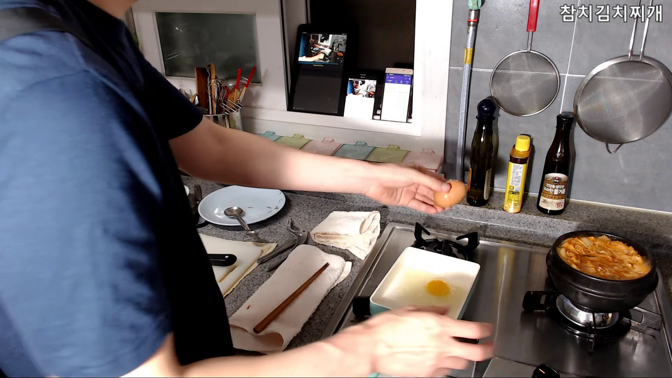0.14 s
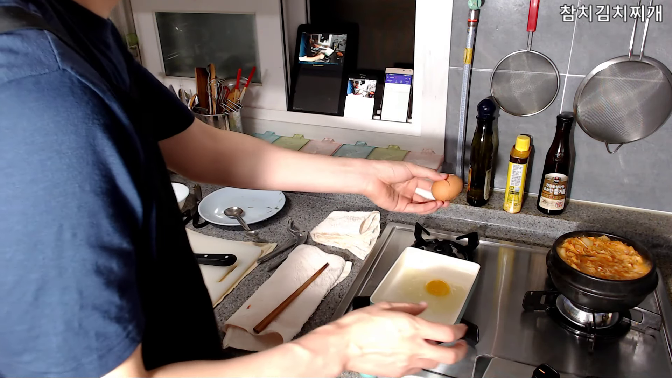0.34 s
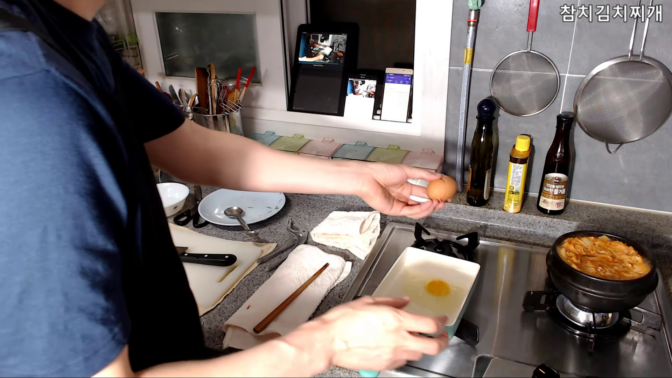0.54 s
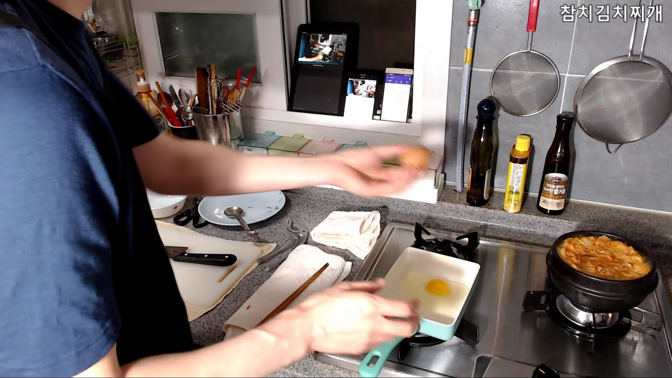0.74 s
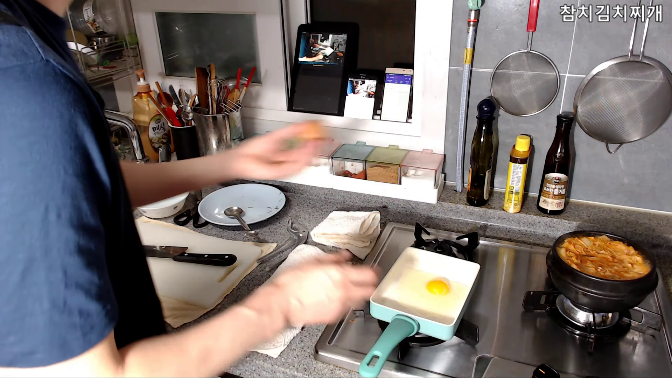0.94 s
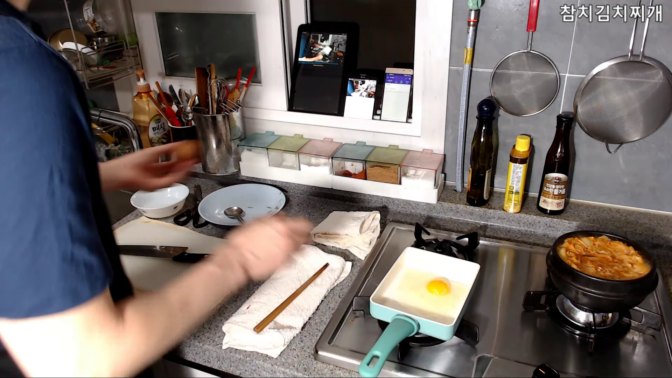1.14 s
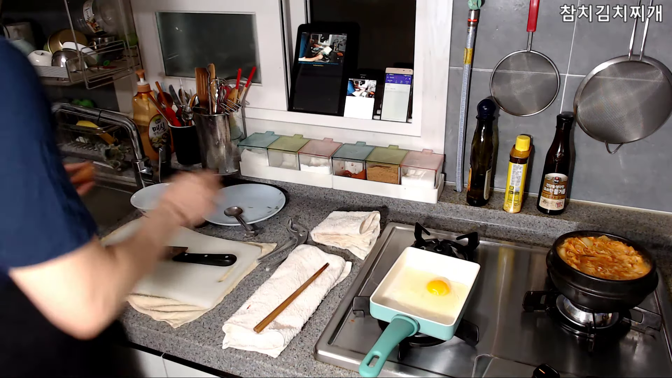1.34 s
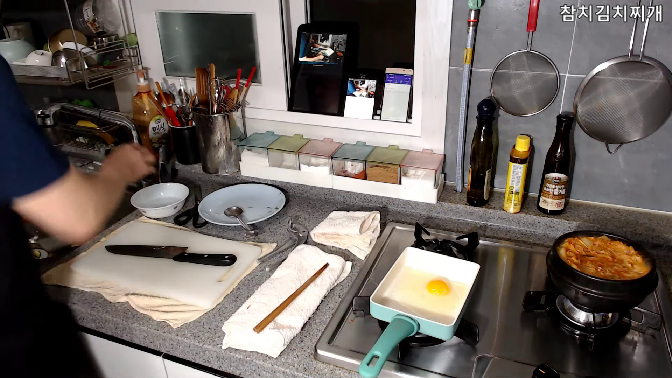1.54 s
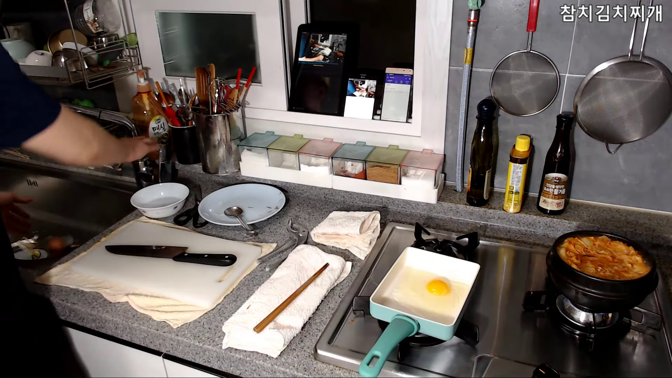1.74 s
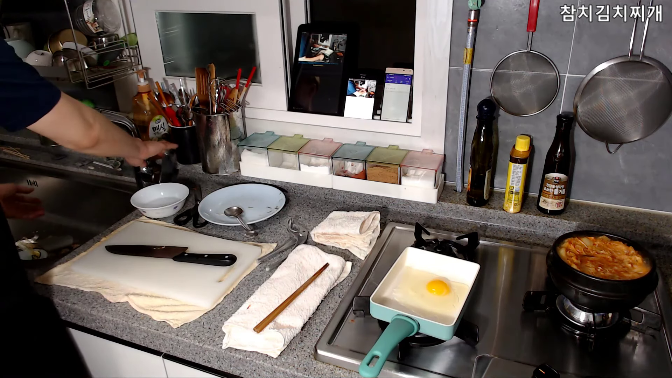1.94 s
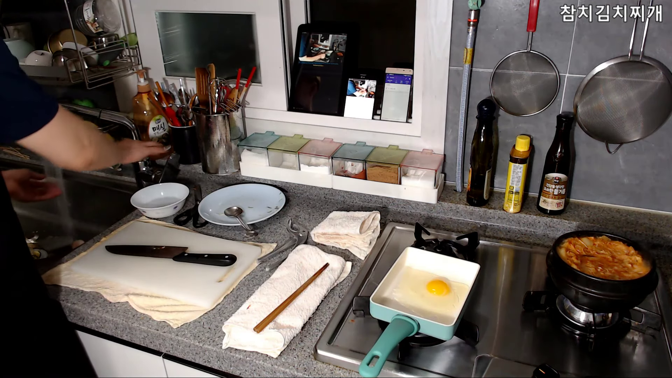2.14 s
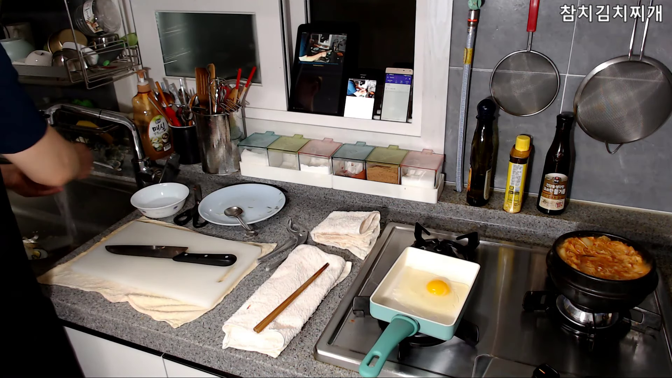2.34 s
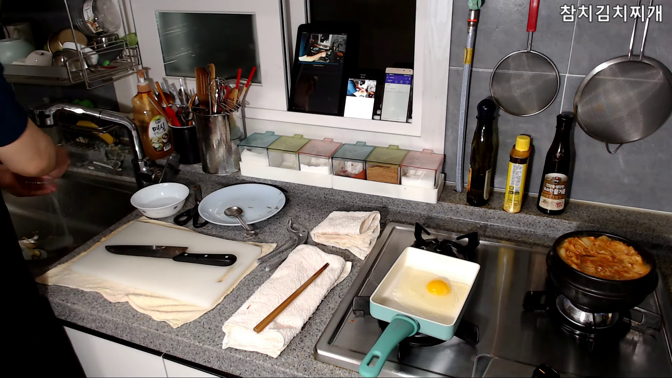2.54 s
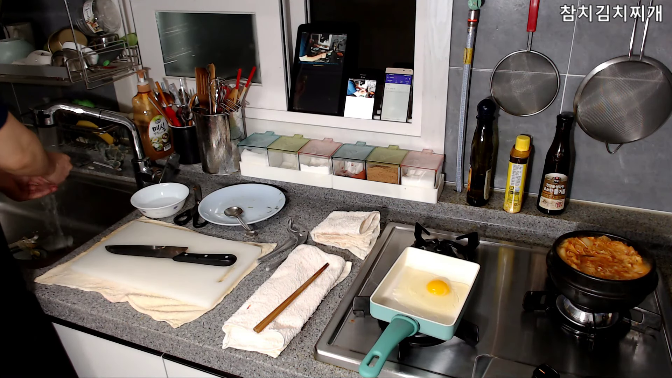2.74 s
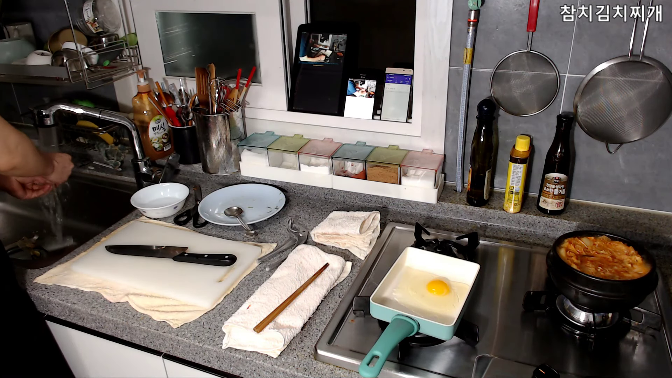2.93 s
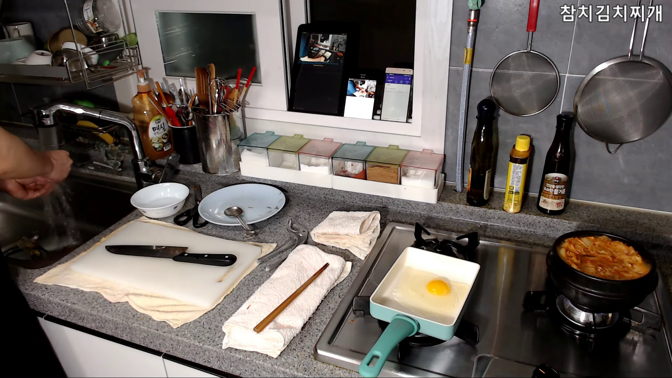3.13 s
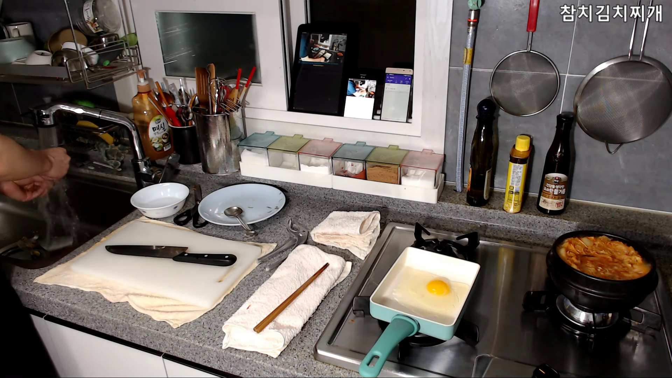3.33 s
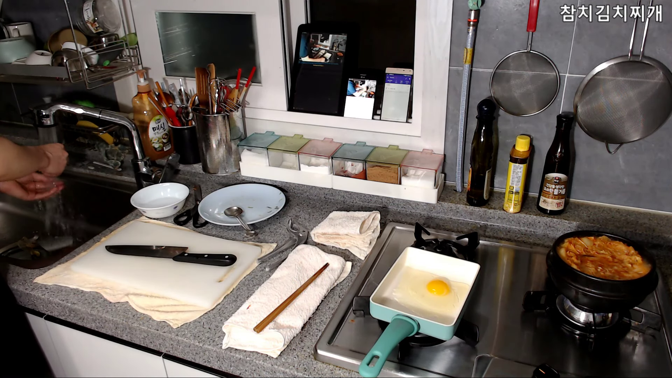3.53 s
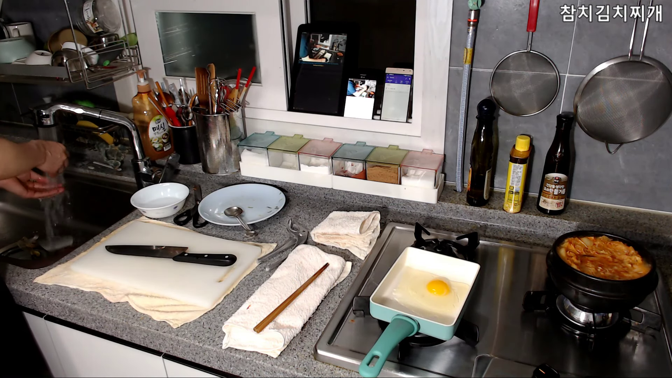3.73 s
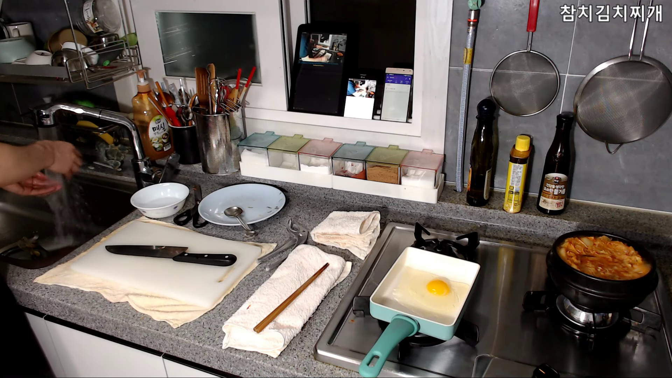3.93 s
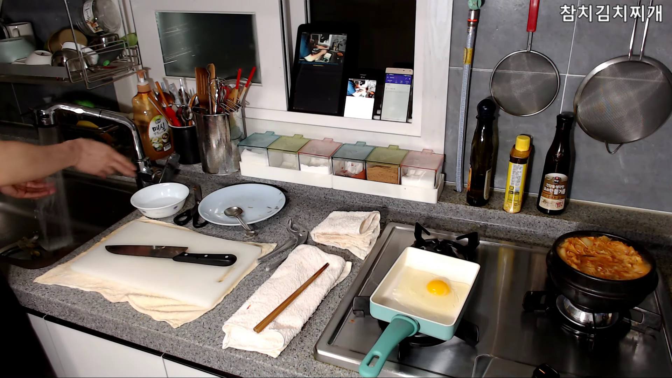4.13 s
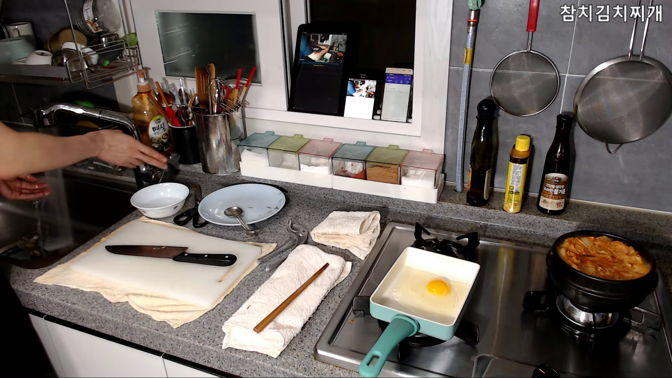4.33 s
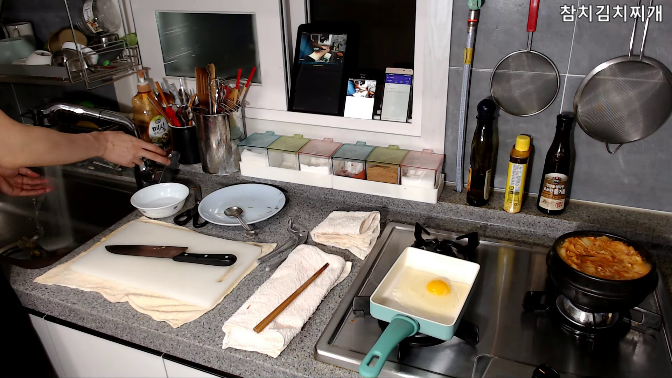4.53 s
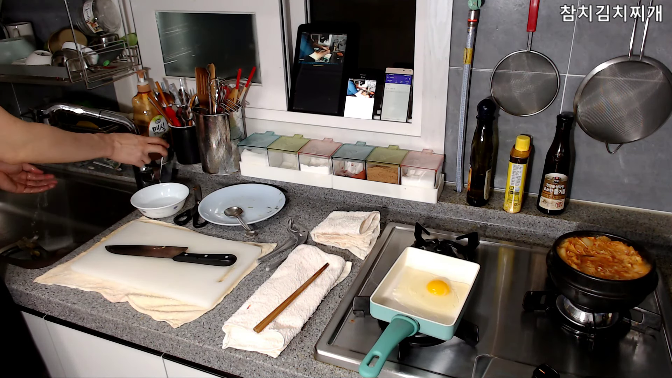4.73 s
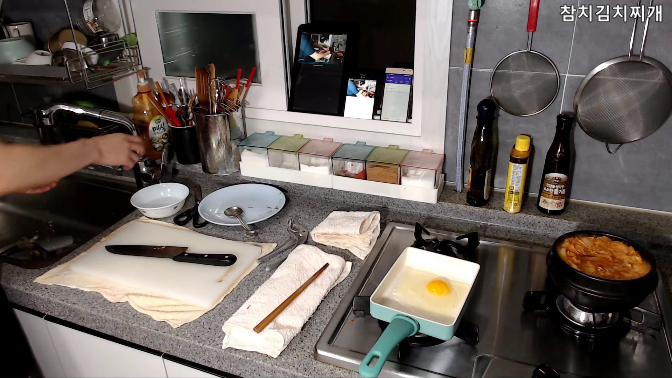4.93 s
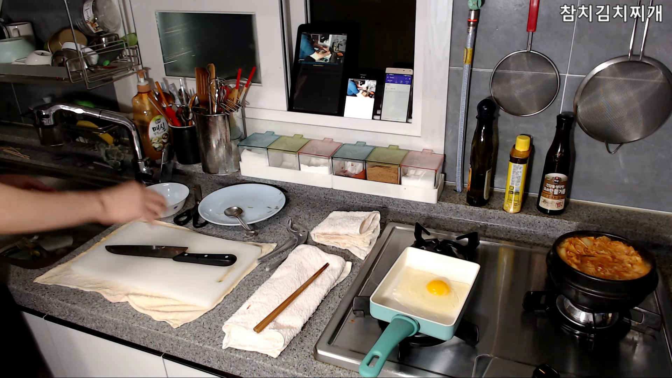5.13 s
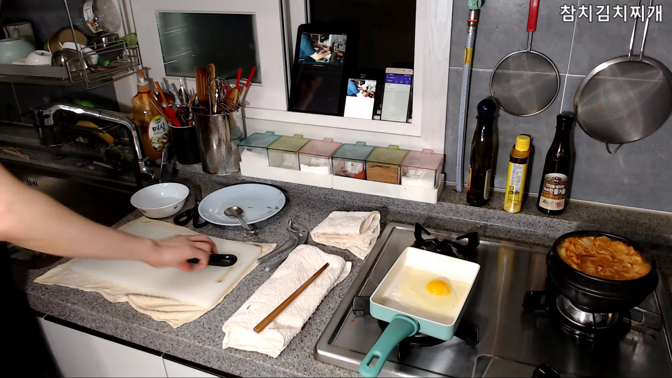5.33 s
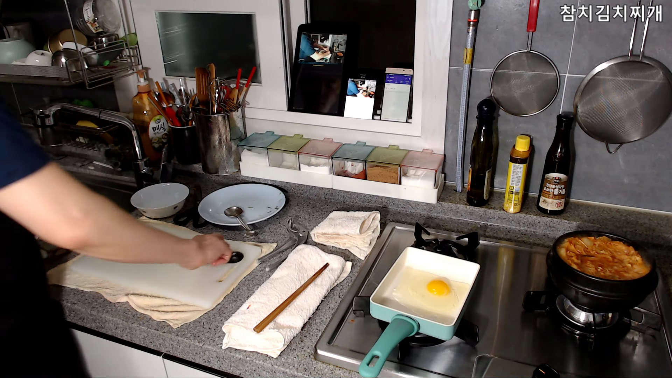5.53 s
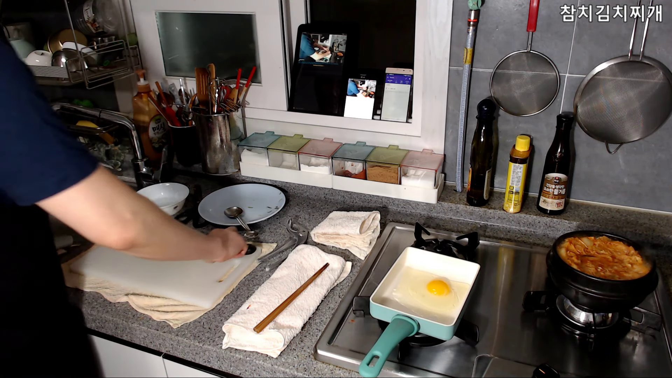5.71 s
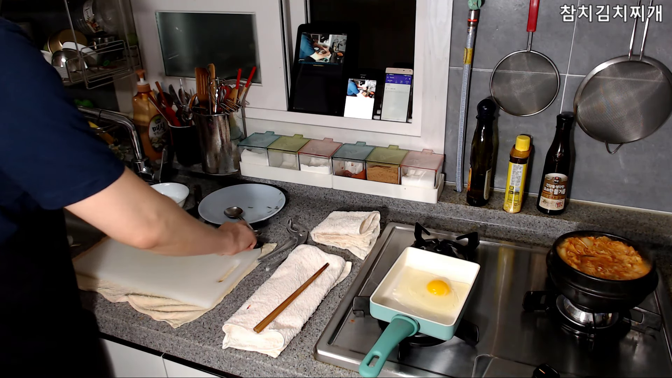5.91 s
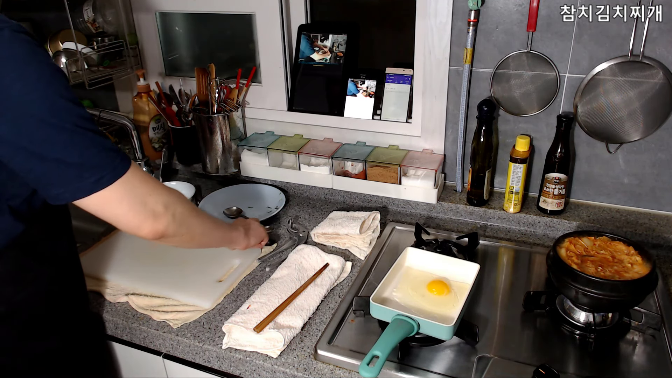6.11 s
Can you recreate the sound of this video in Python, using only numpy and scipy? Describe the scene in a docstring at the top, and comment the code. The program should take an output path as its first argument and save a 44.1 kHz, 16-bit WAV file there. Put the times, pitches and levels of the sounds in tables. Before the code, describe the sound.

In a small kitchen, a stew simmers faintly on a hissing gas ring. A thrown eggshell strikes a steel sink and bounces. The tap then runs over hands for a few seconds, spraying, gurgling and drumming on the basin, and is shut off with a few drips. A knife slides off a cutting board, clinks against cutlery and knocks sharply on the board. One microphone picks up everything with a short room echo.

```python
"""Kitchen sink and stove

A small hard-walled kitchen, one microphone. A stew simmers on a hissing gas ring; a rumble comes up
through the counter. A faint hiss swells, with two soft brushes; a thrown eggshell rings the steel sink.
The tap runs over hands, spraying, bubbling and drumming on the basin, and is shut; drops plink. A knife
slides off a board, something hard drags over a plate, the knife clinks on cutlery, knocks the board."""
import sys
import numpy as np
from scipy import signal
from scipy.fft import rfft, irfft, next_fast_len
from scipy.io import wavfile
from scipy.ndimage import uniform_filter1d, map_coordinates

SR = 44100
rng = np.random.default_rng(int(sys.argv[2]) if len(sys.argv) > 2 else 0)


def wav_record(signal):
    """Record a signal, one row per channel, as 16-bit PCM in the file named by sys.argv[1]."""
    frames = np.transpose(np.atleast_2d(signal))
    bounded = np.clip(frames, -1, 1)
    # unit amplitude maps onto the largest positive 16-bit level
    quanta = np.round(bounded * 32767).astype(np.int16)
    wavfile.write(sys.argv[1], SR, quanta)


N = 271819

# steel sink resonances: f/Hz, width/Hz, lift/dB
BASIN = [(205, 38, 2.5), (357.6, 16, 10.5), (563, 86, 6.5), (652, 24, 7.5), (749, 31, 9), (1200, 14, 3),
         (1405, 28, 5), (1574, 19, 9.5), (1767, 30, 5), (2700, 100, -2), (3280, 15, 3), (3770, 42, 3),
         (4420, 34, -2), (5760, 25, -3), (7020, 52, 4.5)]
# short splashy burst in the basin as the shell bounces: t/s, attack/s, hold/s, release/s
BOUNCE_SPLASH = (1.7, 0.046, 0.0079, 0.063)
OPEN_S, SHUT_S = 2.105, 4.618  # full stream


def amp(db):
    """dB to gain."""
    return 10 ** (np.asarray(db) / 20)


def unit(x):
    """x at rms 1."""
    return x / np.sqrt(np.mean(x ** 2) + 1e-20)


def along(points, hz):
    """Interpolate (f/Hz, value) points on a log axis."""
    f, v = np.transpose(points)
    return np.interp(np.log(hz + 1), np.log(f + 1), v)


def lift(hz, humps):
    """dB added by resonances (f/Hz, width/Hz, lift/dB)."""
    return sum(db / (1 + (2 * (hz - centre) / width) ** 2) for centre, width, db in humps)


def envelope(points):
    """Gain through (t/s, level/dB) points, silent outside them."""
    times, db = np.transpose(points)
    return amp(np.interp(np.arange(N) / SR, times, db, -150, -150))


def stroke(at_s, db, attack_s, hold_s, release_s):
    """Gain held from at_s; attack and release are times per 30 dB."""
    t = np.arange(N) / SR - at_s
    return amp(db - 30 * (np.maximum(-t, 0) / attack_s + np.maximum(t - hold_s, 0) / release_s))


def wobble(rate_hz):
    """Smooth curve through random knots."""
    knots = rng.standard_normal(int(N * rate_hz / SR) + 4)
    return map_coordinates(knots, [np.arange(N) * rate_hz / SR])


def filtered(x, response):
    """Zero-phase filter of gain response(f/Hz)."""
    m = next_fast_len(x.shape[-1] + 8192)
    return irfft(rfft(x, m) * response(np.fft.rfftfreq(m, 1 / SR)), m)[..., :x.shape[-1]]


def causal(x, gain_db):
    """Minimum-phase filter: nothing sounds before the blow."""
    cepstrum = irfft(np.log(amp(gain_db(np.fft.rfftfreq(4096, 1 / SR))) + 1e-6))
    cepstrum[1:2048] *= 2
    cepstrum[2049:] = 0
    return signal.fftconvolve(x, irfft(np.exp(rfft(cepstrum))))[:len(x)]


def rush(colour, humps, patchy_db):
    """Coloured noise, rms 1, with resonant humps and patches of random gain."""
    z = signal.stft(rng.standard_normal(N + 512), nperseg=256)[2]
    patches = uniform_filter1d(rng.standard_normal(z.shape), size=4, axis=0)
    patches = uniform_filter1d(patches, size=8, axis=1)
    noise = signal.istft(z * amp(patchy_db * unit(patches)), nperseg=256)[1][:N]
    return unit(filtered(noise, lambda f: amp(along(colour, f) + lift(f, humps))))


def echoes(near_db):
    """Fresh room tail, energy 1: dense near echoes, then a decay that varies with frequency."""
    # kitchen reverberation: f/Hz, t60/s
    reverb_times = [(100, 0.45), (500, 0.42), (2000, 0.44), (5000, 0.38), (10000, 0.33)]
    hz, t, z = signal.stft(rng.standard_normal(SR // 2), SR, nperseg=128)
    decay = amp(-60 * t / along(reverb_times, hz)[:, None]) + amp(near_db - 60 * t / 0.088)
    tail = signal.istft(z * decay, SR, nperseg=128)[1][:SR // 2]
    return tail / np.linalg.norm(tail)


def kitchen(x, wet_db):
    """Moving water excites the room from ever new spots: cross-faded pieces, each with its own tail."""
    out, hop = np.pad(x, (0, SR)), SR // 10
    fade = np.hanning(2 * hop + 1)[:-1]
    for at in range(0, N - 2 * hop, hop):
        wet = signal.fftconvolve(x[at:at + 2 * hop] * fade, echoes(near_db=0))
        out[at:at + len(wet)] += amp(wet_db) * wet
    return out[:N]


def bubble(t, hz, rise, life_s):
    """Damped sine whose pitch climbs as the bubble nears the surface."""
    phase = 2 * np.pi * hz * (t + rise * t * np.tanh(t / (2 * life_s)))
    return np.sin(phase) * np.exp(-2 * t / life_s) * (1 - np.exp(-t * hz / 2))


def fizz(count, mid_hz, spread, cycles, scatter_db):
    """Dense random crowd of small bubbles, rms 1."""
    starts = (rng.random(count) * N).astype(int)
    hz = np.clip(mid_hz * np.exp(spread * rng.standard_normal(count)), 700, 11000)[:, None]
    size = np.minimum(rng.exponential(size=count), 4)
    k = np.arange(640)
    grains = amp(scatter_db * size)[:, None] * bubble(k / SR, hz, 0.14, cycles / hz)
    return unit(np.bincount((starts[:, None] + k).ravel(), grains.ravel(), N)[:N])


def place(out, x, at_s, db, window):
    """Add x at at_s, its peak rms over window samples set to db."""
    peak = np.sqrt(uniform_filter1d(x ** 2, size=window).max())
    out[round(at_s * SR):][:len(x)] += amp(db) * x / peak


def blows(hits, colour, modes, hump_db, wet_db, neighbour_gain):
    """Each blow: a rattle of contacts with its room tail; the modes ring on, each with two neighbours."""
    out, t = np.zeros(N + SR), np.arange(SR // 2) / SR
    humps = [(hz, 60 + 7 / t60, hump_db) for hz, _, t60 in modes]
    detune = 0.012 * np.array([[0], [-1], [1]])
    for at_s, db, rise_s, rattle_s, tilt_db, ring_db in hits:
        swell = (1 - np.exp(-t / rise_s)) ** 2
        lumps = amp(2.5 * rng.standard_normal(len(t) // 40 + 1).repeat(40)[:len(t)])
        contacts = amp(-60 * t / rattle_s) * lumps * rng.standard_normal(len(t))
        slope = lambda f: tilt_db * np.log2((f + 100) / 2000)
        burst = contacts / np.linalg.norm(contacts) + amp(wet_db) * echoes(near_db=-14)
        crack = causal(swell * burst, lambda f: along(colour, f) + slope(f) + lift(f, humps))
        ring = np.zeros(len(t))
        for hz, mode_db, t60 in modes:
            cluster_hz = hz * (1 + detune * rng.uniform(0.4, 1.6, (3, 1)))
            sines = np.sin(2 * np.pi * (cluster_hz * t + rng.random((3, 1))))
            cluster = np.array([1, neighbour_gain, neighbour_gain]) @ sines
            ring += amp(mode_db + slope(hz) - 60 * t / t60) * cluster
        place(out, unit(crack) + amp(ring_db) * unit(swell * ring), at_s, db, window=300)
    return out[:N]


def stove():
    """The gas ring hisses steadily under the simmer."""
    # simmer and hiss: f/Hz, density/dB
    colour = [(41, -45), (70, -4.5), (123, -10), (181, -3), (208, -10.5), (238, 0.5), (350, -7.5),
              (980, -12.5), (1950, -12.5), (6500, -20.5), (8500, -27), (10400, -27), (15700, -39)]
    # steady bands in it: f/Hz, width/Hz, lift/dB
    bands = [(1980, 120, 6), (2743, 70, 9.5), (3390, 210, 4.5), (117, 9.1, 17.5), (363.7, 17, 7.5)]
    # loudness: t/s, level/dB
    levels = [(0, -52), (6.17, -50.5)]
    return envelope(levels) * rush(colour, bands, patchy_db=1.43)


def counter_rumble():
    """A low rumble comes up through the counter while the cook leans at the sink."""
    # swells: t/s, level/dB
    swells = [(0, -57.5), (1.17, -64), (1.36, -53), (1.59, -39.5), (2.06, -54.5), (2.46, -37.5),
              (2.65, -54.5), (3.26, -40.5), (3.67, -49.5), (3.98, -39.5), (4.32, -52.5), (4.6, -42.5),
              (5.0, -51), (5.4, -48.5), (6.17, -64)]
    # rumble: f/Hz, density/dB
    colour = [(8.8, -33), (15, 3.5), (38, 3), (62, -0.5), (100, -27), (240, -120)]
    return envelope(swells) * rush(colour, [], patchy_db=1.5)


def faint_hiss():
    """A faint high hiss swells slowly, with two soft brushes."""
    # brush, slow swell, brush: t/s, level/dB, attack/s, hold/s
    swells = [(0.64, -59, .04, 0.031), (1.35, -60, 1, .03), (1.387, -50.5, 0.04, 0.15)]
    # high hiss: f/Hz, density/dB
    colour = [(2000, -9), (4000, -3.5), (5500, 1), (8000, -2.5), (12000, -10.5), (16000, -21)]
    return sum(stroke(*row, release_s=0.13) for row in swells) * rush(colour, [], patchy_db=1)


def drops():
    """Each drop leaves a bubble, heard mostly by its echoes; in the stream it can throw droplets."""
    # bubbles: t/s, level/dB, f/Hz, life/cycles
    plinks = [(1.462, -46.5, 1270, 4.8), (1.94, -41.5, 1190, 5.5), (2.101, -40.5, 1085, 23),
              (2.11, -35, 2500, 4.4), (2.211, -31, 1516, 29), (2.372, -37, 1500, 7.4),
              (2.418, -38, 1095, 17), (2.514, -37, 1310, 17), (2.6, -35.5, 2440, 16),
              (2.894, -51, 1360, 18), (2.975, -38, 4530, 10), (3.108, -38.5, 1340, 32),
              (3.162, -31.5, 5200, 8), (3.211, -35.5, 1860, 18), (3.242, -33.5, 3950, 5.8),
              (3.345, -33.5, 3730, 6.1), (3.368, -37, 3400, 5), (3.412, -36.5, 2760, 8),
              (3.445, -31, 4640, 9.7), (3.488, -33, 6240, 3.6), (3.59, -37, 3100, 5.8),
              (3.66, -35, 3340, 3.3), (3.71, -35, 2680, 6), (3.85, -35, 2690, 12), (3.931, -38, 2570, 8),
              (4.781, -43, 7900, 6), (5.0895, -42.5, 3200, 6), (5.092, -39.5, 4000, 3.3),
              (5.219, -44, 7130, 3.6)]
    clean_cycles = 15  # longer-lived bubbles form in still water: no droplets
    out, t = np.zeros(N + SR), np.arange(SR // 2) / SR
    for at_s, db, hz, cycles in plinks:
        direct = bubble(t, hz, 0.057, cycles / hz)
        direct /= np.linalg.norm(direct)
        late_s = 0.02 * rng.random((6, 1))
        droplet_hz = hz * np.exp(0.22 * rng.standard_normal((6, 1)))
        droplets = bubble(np.maximum(t - late_s, 0), droplet_hz, 0.12, 5 / droplet_hz).sum(axis=0)
        if OPEN_S < at_s < SHUT_S and cycles < clean_cycles:
            direct += amp(-5) * droplets / np.linalg.norm(droplets)
        wet = signal.fftconvolve(direct, echoes(near_db=8))[:len(t)]
        place(out, direct + amp(20) * wet, at_s, db, window=600)
    return out[:N]


def eggshell():
    """The shell strikes the dry basin; narrower resonances ring longer."""
    # impacts: t/s, level/dB, rise/s, rattle t60/s, tilt/(dB/octave), ring/dB
    hits = [(1.5645, -13, 0.0023, 0.027, 0.8, -9), (1.705, -19, 0.0034, 0.097, -1.5, -17),
            (1.717, -30, 0.00046, 0.042, -4.5, -3)]
    # shell on steel: f/Hz, density/dB
    colour = [(60, -11.5), (200, -10.5), (420, -14), (700, -9.5), (950, -10), (1300, -7), (2200, -5),
              (3200, -7), (4600, -5), (7000, -6.5), (9500, -13.5), (15700, -33)]
    # coupling of the basin floor to its modes: f/Hz, gain/dB
    coupling = [(350, -9), (700, 2), (1230, 8), (1500, 0)]
    modes = [(hz, db + along(colour, hz) + along(coupling, hz), 5 / width) for hz, width, db in BASIN]
    return blows(hits, colour, modes, hump_db=6.5, wet_db=0, neighbour_gain=0.45)


def tap_water():
    """Water sprays off the hands and bubbles in the pool; the basin rings under the gurgle."""
    # spray off the hands: t/s, level/dB
    spray_levels = [(2.03, -60), (2.045, -35.5), (2.085, -36.5), (2.1, -29.5), (2.16, -35.5), (2.4, -34.5),
                    (2.8, -36), (2.87, -32.5), (3.0, -32), (3.45, -33.5), (4.2, -32), (4.6, -35),
                    (4.72, -44), (5.0, -55.5), (5.25, -55.5)]
    # spray: f/Hz, density/dB
    spray_colour = [(880, -17), (1700, -38), (1860, -3.5), (2800, 0.5), (3670, -0.5), (6420, 1),
                    (8500, -3.5), (12500, -12), (15700, -18.5)]
    # pooled water: f/Hz, density/dB
    gurgle_colour = [(500, -30), (800, -6), (1200, 0), (1700, 0), (2600, -10), (4000, -40)]
    # extra gurgle as the basin first fills: t/s, level/dB, hold/s, release/s
    pooling = (2, -58, 0.4, 0.2)
    bounce_s, *bounce_shape = BOUNCE_SPLASH
    pool_s, pool_db, *pool_shape = pooling
    spray = envelope(spray_levels) + stroke(bounce_s, -47, *bounce_shape)
    gurgle = stroke(OPEN_S, -46.5, 0.2, SHUT_S - OPEN_S, 0.35) * amp(0.7 * wobble(6.46))
    gurgle += stroke(pool_s, pool_db, 0.2, *pool_shape) + stroke(bounce_s, -53, *bounce_shape)
    flutter = amp(0.9 * wobble(24))
    fine = rush(spray_colour, BASIN, patchy_db=1.5)
    fine += amp(-8) * fizz(5000, mid_hz=4250, spread=0.4, cycles=7.2, scatter_db=2.5)
    crackle = spray * fizz(4000, mid_hz=6300, spread=0.48, cycles=2.5, scatter_db=3)
    coarse = rush(gurgle_colour, BASIN, patchy_db=1)
    coarse += amp(0.5) * fizz(1500, mid_hz=1398, spread=0.231, cycles=10, scatter_db=1.5)
    splash = kitchen(flutter * (spray * unit(fine) + gurgle * unit(coarse)), wet_db=-2.5)
    tall_humps = [(hz, width, 3 * db) for hz, width, db in BASIN]
    ring = gurgle * rush(gurgle_colour, tall_humps, patchy_db=4)
    return amp(-1.5) * splash + amp(-5) * ring + amp(-11.5) * crackle


def basin_drumming():
    """The stream drums on the steel, which answers later and longer than the gurgle."""
    # drummed steel: f/Hz, density/dB
    colour = [(70, -10), (120, 4), (161, -5), (215, 3), (355, -3.5), (562, -3), (900, -12.5), (1170, -4),
              (1980, -120)]
    bounce_s, *bounce_shape = BOUNCE_SPLASH
    stream = stroke(OPEN_S + 0.065, -44.5, 0.16, SHUT_S - OPEN_S, 0.7) * amp(1.2 * wobble(11))
    return (stream + stroke(bounce_s, -42, *bounce_shape)) * rush(colour, BASIN, patchy_db=2)


def spout():
    """The spout hisses on opening and with the last trickle."""
    # hisses: t/s, level/dB, attack/s, hold/s, release/s
    hisses = [(1.936, -40.5, 0.071, .01, 0.71), (4.75, -55.5, 0.35, 0.18, 4.3)]
    # hiss: f/Hz, density/dB
    colour = [(4000, -2.5), (10000, -3), (13000, -7), (15700, -14)]
    return sum(stroke(*row) for row in hisses) * rush(colour, [], patchy_db=2.5)


def knife_slide():
    """The blade, nudged then dragged, scrapes the board over a low scuff."""
    # moves: t/s, scrape/dB, scuff/dB, attack/s, hold/s
    moves = [(5.315, -59, -50.5, 0.11, .02), (5.381, -59, -49, 0.045, .01), (5.455, -58, -54.5, .05, 0.018),
             (5.564, -49.5, -68, 0.11, 0.12)]
    # blade friction: f/Hz, density/dB
    scrape_colour = [(600, -11), (900, 4), (2000, -21), (3200, -1), (4000, -1), (5000, -5), (7000, -10),
                     (12000, -30)]
    # blade resonances: f/Hz, width/Hz, lift/dB
    blade = [(4620, 57, 15), (3860, 42, 12)]
    # low scuff: f/Hz, density/dB
    scuff_colour = [(70, -14), (180, 0), (350, -3), (700, -8), (1500, -14), (2500, -30)]
    release_s = 0.15
    scrape = sum(stroke(at_s, db, *shape, release_s) for at_s, db, _, *shape in moves)
    scuff = sum(stroke(at_s, db, *shape, release_s) for at_s, _, db, *shape in moves)
    scrape *= rush(scrape_colour, blade, patchy_db=2.5)
    scuff *= rush(scuff_colour, [], patchy_db=2.5)
    return scrape + scuff


def plate_drag():
    """Something hard is pulled twice over a plate, which sings faintly at its modes."""
    # pulls: t/s, level/dB, attack/s, hold/s
    pulls = [(5.748, -48.5, 0.081, 0.011), (5.883, -45, 0.29, 0.15)]
    # gritty friction: f/Hz, density/dB
    colour = [(500, -4), (1000, -4.5), (3000, -5), (7000, -6.5), (14000, -27)]
    # plate resonances: f/Hz, width/Hz, lift/dB
    plate = [(1400, 28, 19.5), (1955, 83, 13), (2430, 70, 11), (2740, 40, 5), (3230, 70, 11),
             (3690, 99, 18), (5580, 70, 12), (6600, 67, 15), (7640, 100, 6), (8590, 45, 8)]
    return sum(stroke(*row, release_s=0.092) for row in pulls) * rush(colour, plate, patchy_db=3)


def cutlery_clinks():
    """The knife strikes cutlery and the metal rings."""
    # impacts: t/s, level/dB, rise/s, rattle t60/s, tilt/(dB/octave), ring/dB
    hits = [(5.889, -30, 0.00077, 0.052, 0.17, -0.5), (6.1378, -19.5, 0.00054, 0.083, 0.098, -6)]
    # metal contact: f/Hz, density/dB
    colour = [(200, -14), (700, -0.5), (3000, -8.5), (5200, -11.5), (8500, -21), (15700, -37)]
    # cutlery modes: f/Hz, level/dB, t60/s
    modes = [(1986, -8, 0.13), (2320, -9, .12), (2630, -23, 0.11), (3240, 10.5, 0.084), (4260, -9, 0.4),
             (4800, -2, 0.27), (6900, -1.5, 0.1), (7170, -12, 0.14), (8970, -18, 0.14)]
    return blows(hits, colour, modes, hump_db=7.5, wet_db=7, neighbour_gain=0.42)


def board_knocks():
    """The knife knocks the board, whose modes die quickly."""
    # impacts: t/s, level/dB, rise/s, rattle t60/s, tilt/(dB/octave), ring/dB
    hits = [(6.0243, -25, 0.00057, 0.094, 0.4, -20), (6.0315, -15, 0.0014, 0.17, 0.8, -2),
            (6.0495, -19.5, 0.0018, 0.037, 3, -3.5), (6.068, -23, 0.00093, 0.019, -2.5, -28)]
    # knife on board: f/Hz, density/dB
    colour = [(60, -10), (200, -4), (500, -3), (850, 5), (1150, 0.5), (1600, -1.5), (3000, -4),
              (4100, -7.5), (5500, -12.5), (8800, -15.5), (10000, -32), (15700, -41)]
    # board modes: f/Hz, level/dB, t60/s
    modes = [(842, -10, 0.078), (1120, 4, 0.031), (3010, -10, 0.12), (4080, -11, 0.11), (6400, -14.5, 0.12),
             (7450, -6.5, 0.045), (8640, -23, .08)]
    return blows(hits, colour, modes, hump_db=0, wet_db=-4, neighbour_gain=0.8)


def scene():
    """All sources at one point in the room, the same in both channels."""
    background = stove() + counter_rumble() + faint_hiss()
    sink = drops() + eggshell() + tap_water() + basin_drumming() + spout()
    utensils = knife_slide() + plate_drag() + cutlery_clinks() + board_knocks()
    return np.tile(background + sink + utensils, (2, 1))


def record(dry):
    """Brick-wall low-pass."""
    return filtered(dry, lambda hz: hz < 15760)


dry = scene()
out = record(dry)
wav_record(out)
```